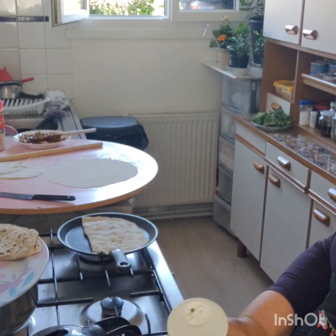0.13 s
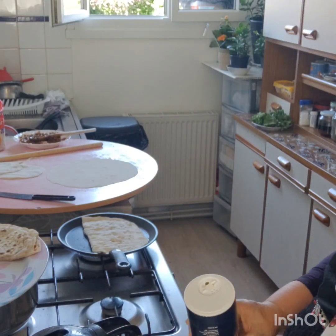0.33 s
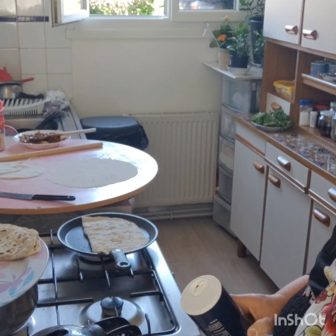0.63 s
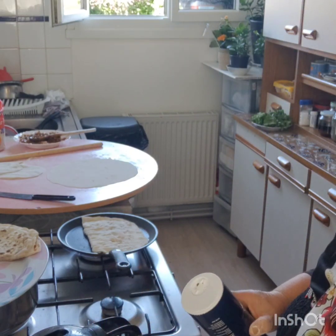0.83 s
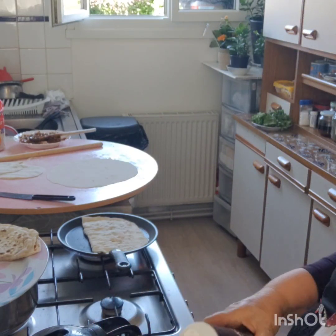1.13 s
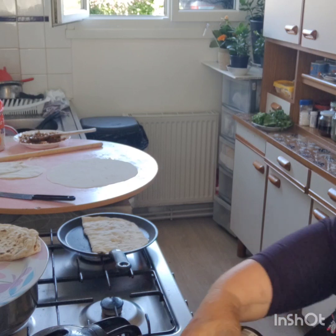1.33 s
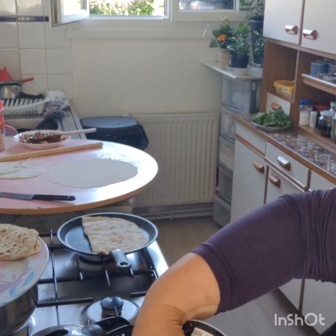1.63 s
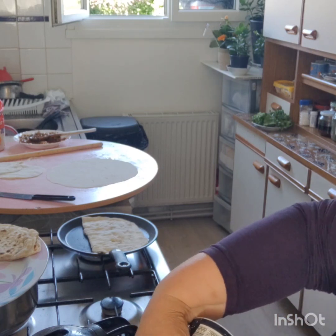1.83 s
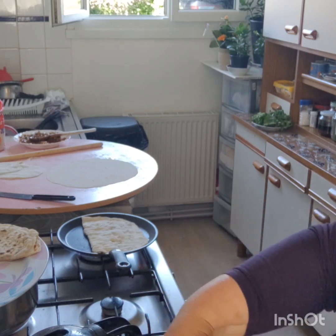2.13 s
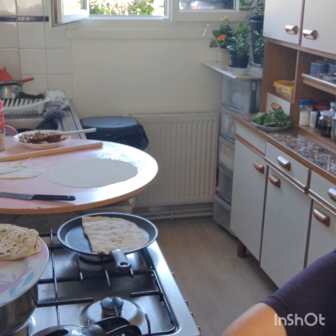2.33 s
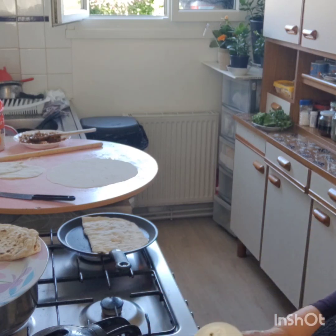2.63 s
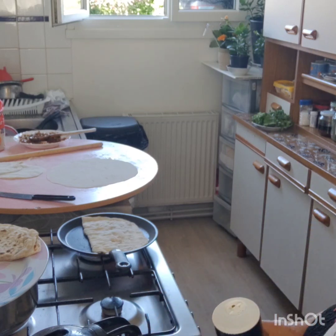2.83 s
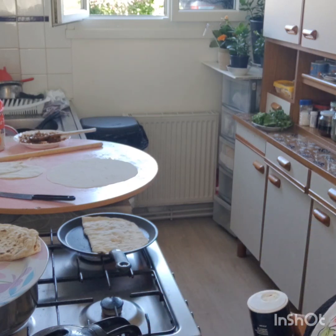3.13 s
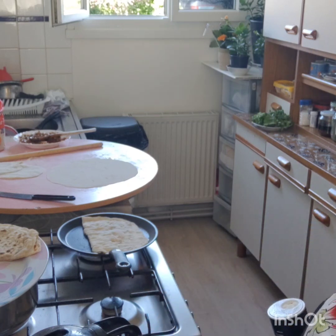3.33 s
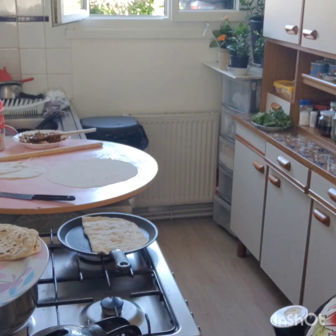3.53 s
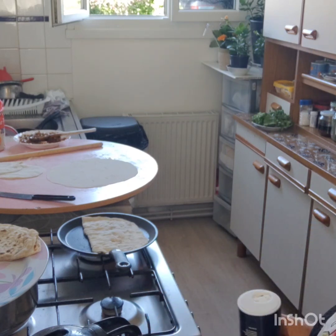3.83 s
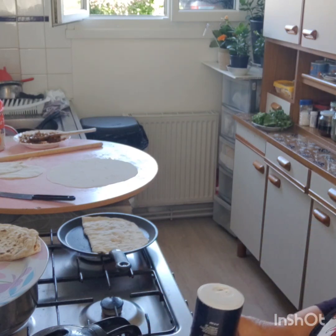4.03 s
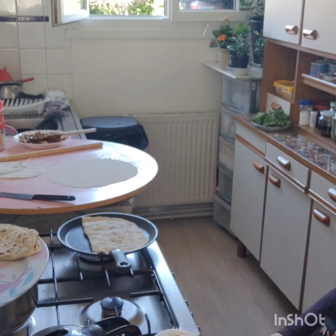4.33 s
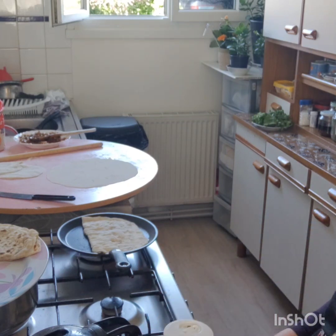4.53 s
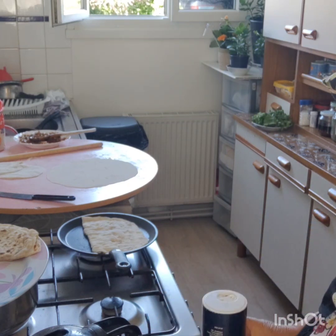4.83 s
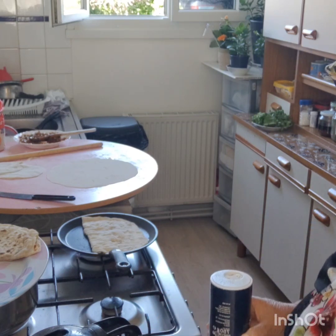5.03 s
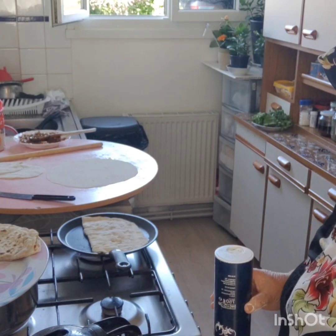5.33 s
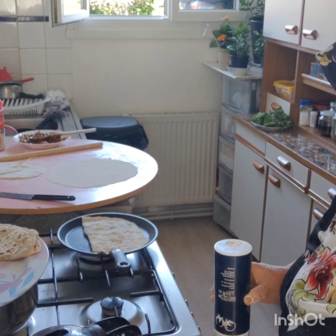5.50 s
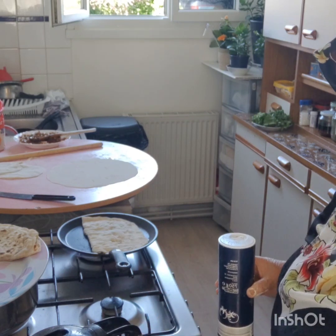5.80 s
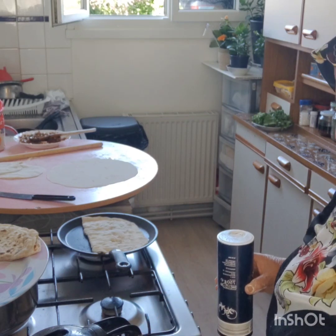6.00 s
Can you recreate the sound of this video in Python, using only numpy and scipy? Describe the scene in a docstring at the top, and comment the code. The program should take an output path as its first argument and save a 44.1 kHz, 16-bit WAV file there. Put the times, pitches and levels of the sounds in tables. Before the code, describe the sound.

A cardboard canister of salt is handled close to the microphone in a small tiled kitchen, over a very faint steady burner hiss. Quiet granular swishes come at the start and around two seconds, with light hollow knocks and ticks. After a sparse, quiet stretch, four far louder palm slaps hit the tube in quick, even succession, each rattling the salt and ringing briefly in the room.

```python
"""Small tiled kitchen: a cardboard salt canister is tipped to and fro near a lit gas stove.
Salt slides along the tube as shaped grain noise; the burner hisses faintly throughout as steady noise.
Hand and lid knock lightly (decaying modes), small taps ring on one note, a few rough blips rise in pitch.
At the end the tube is slapped four times: mode banks struck by palm contacts, each throwing salt about.
Slaps, knocks, taps and blips echo in the kitchen."""
import sys
import numpy as np
from scipy import signal
from scipy.fft import rfft, irfft
from scipy.io import wavfile
from scipy.ndimage import uniform_filter1d

SR = 44100
rng = np.random.default_rng(int(sys.argv[2]) if len(sys.argv) > 2 else 0)


def master(y):
    """Save y as 16-bit WAV."""
    cut = np.clip(np.atleast_2d(y).T, -1, 1)
    pcm = np.round(cut * 32767)  # scale
    wavfile.write(sys.argv[1], SR, pcm.astype(np.int16))


N = 271799  # samples

# slaps on the tube: (time [s], peak before direct and echo gains [dB], brightness [dB/octave],
# contact decay [ms], direct sound gain [dB], left minus right [dB])
SLAPS = [(5.3013, -1.5, -0.37, 0.72, -9.5, -4), (5.497, -1, 0.96, 3.5, -3.5, 0.5),
         (5.674, -5, -0.05, 2.8, -2.5, -11.5), (5.856, -2.5, 0.4, 3, 0, -2.5)]
# stereo width of diffuse sound: (frequency [Hz], side minus mid [dB])
SIDE_DB = [(60, -33), (130, 1), (290, -5.5), (640, -2.5), (1400, -2), (3070, 0.5), (6740, -4.5),
           (14800, -16.5)]
# stereo width of struck sound and echo: (frequency [Hz], side minus mid [dB])
SLAP_SIDE_DB = [(60, -18), (150, -19), (380, -11), (940, 0.5), (2360, -0.5), (5910, 1), (14800, -4.5)]


def from_db(db):
    """Decibels to gain."""
    return 10 ** (np.asarray(db) / 20)


def rms_one(x):
    """Scale to unit rms."""
    return x / np.sqrt(np.mean(x ** 2) + 1e-20)


def peak_one(x):
    """Scale to unit peak."""
    return x / np.abs(x).max()


def at_hz(points, hz):
    """Read a table on a log-frequency axis."""
    table_hz, values = np.array(points).T
    return np.interp(np.log(np.maximum(hz, 1)), np.log(table_hz), values)


def colour(x, spectrum, peaks=()):
    """Shape a steady noise by a spectrum and bell-shaped resonances; rms 1."""
    hz = np.arange(N // 2 + 1) * SR / N
    db = at_hz(spectrum, hz)
    for centre_hz, width_hz, top_db in peaks:
        db = db + top_db / (1 + (2 * (hz - centre_hz) / width_hz) ** 2)
    return rms_one(irfft(rfft(x) * from_db(db), N))


def to_stereo(mid, side, side_db):
    """Two microphone ports: mid plus and minus a side signal weighted by frequency."""
    size = mid.shape[-1]
    hz = np.arange(size // 2 + 1) * SR / size
    side = irfft(rfft(side) * from_db(at_hz(side_db, hz)), size)
    return np.array([mid + side, mid - side])


def drift(rate_hz):
    """Slow random curve below a rate, rms 1, drawn at SR / 40."""
    lowpass = signal.butter(2, rate_hz, fs=SR / 40, output="sos")
    slow = signal.sosfilt(lowpass, rng.standard_normal(N // 40 + 1002))
    slow = rms_one(slow[1000:])  # filter settled
    return np.interp(np.arange(N) / 40, np.arange(N // 40 + 2), slow)


def add(out, s, sound, pan_db):
    """Place a sound in both channels; pan is left minus right."""
    i = round(s * SR)
    out[:, i:i + sound.shape[-1]] += from_db([[pan_db / 2], [-pan_db / 2]]) * sound[..., :N - i]


def mode(hz, t60_s, phase=0, rise_cycles=0.47):
    """One decaying vibration, a quarter second long; a softer contact builds it up over more cycles."""
    t = np.arange(SR // 4) / SR
    rise = 1 - np.exp(-(t * hz / rise_cycles) ** 2)
    return np.sin(2 * np.pi * hz * t + phase) * from_db(-60 * t / t60_s) * rise


def cluster(hz, deadness):
    """Modes round a pitch; the deader the contact, the wider they lie, the faster they rise and die."""
    # (pitch step at deadness 1 [octaves], strength [linear])
    scatter = [(-0.79, 0.25), (-0.37, -0.31), (-0.27, 0.67), (0.193, 0.96), (0.377, -1.15), (0.642, 0.69),
               (1.62, -0.11)]
    deadness = np.clip(deadness, .1, 1)
    t60_s = 4.82 / deadness / hz  # 4.82 cycles of the centre pitch at deadness 1
    sound = 0
    for step, strength in scatter:
        sound = sound + strength * mode(hz * 2 ** (deadness * step), t60_s, rise_cycles=0.4 / deadness)
    return peak_one(sound)


def kitchen(x):
    """A few wall echoes, then a dense tail from tiles and cupboards that dies band by band."""
    # tail decay: (frequency [Hz], t60 [s])
    kitchen_t60 = [(100, 0.4), (300, 0.49), (1000, 0.33), (3000, 0.24), (8000, 0.19), (14000, 0.05)]
    # nearest walls: (delay [s], level [dB])
    wall_echoes = [(.0055, -11), (.011, -22), (.0225, -16.5), (.043, -27.5)]
    t, tail = np.arange(SR // 2) / SR, 0
    white = rng.standard_normal((2, 2, len(t)))
    edges_hz = 60 * 2 ** np.arange(0, 8.3, .5)
    for k, (low_hz, high_hz) in enumerate(zip(edges_hz, edges_hz[1:])):
        bandpass = signal.butter(2, [low_hz, high_hz], "band", fs=SR, output="sos")
        band = signal.sosfilt(bandpass, white[k % 2])
        t60_s = at_hz(kitchen_t60, np.sqrt(low_hz * high_hz))
        tail = tail + band * from_db(-60 * t / t60_s) / np.sqrt(t60_s * SR / (6 * np.log(10)))
    tail = tail * (1 - np.exp(-t / 0.00088))  # build-up, time constant 0.88 ms
    for k, (s, db) in enumerate(wall_echoes):
        tail[:, round(s * SR)] += from_db(db) * np.array([1, (-1) ** k])  # left and right in turn
    response = to_stereo(*tail, SLAP_SIDE_DB)
    return signal.fftconvolve(x.mean(axis=0)[None], response, axes=1)[:, :N]


def grains():
    """Dense ticks of uneven size, mid and side; about half the samples are silent."""
    size = from_db(0.5 * rng.exponential(1, (2, N)))
    return size * rng.standard_normal((2, N)) * (rng.random((2, N)) < .5)


def salt():
    """Thousands of grains a second tick along the wall; the wall itself rustles lower down."""
    # (start [s], loudest [s], end [s], bright hiss [dB], duller rustle [dB], finest grains [dB])
    slides = [(-0.06, 0.126, 0.33, -49, -53, -49), (1.512, 1.696, 1.86, -50, -48.5, -70),
              (1.835, 1.89, 1.945, -62.5, -63.5, -73), (1.962, 2.03, 2.12, -78.5, -80, -90),
              (2.441, 2.655, 2.86, -48, -51, -48)]
    # bright hiss: (frequency [Hz], level per Hz [dB])
    hiss_spectrum = [(2940, -26), (5000, -9.5), (5360, -11.5), (5970, -7.5), (6550, -6), (7060, -3.5),
                     (8260, 6), (9410, -7), (10000, -29), (13000, -42), (22000, -120)]
    # duller rustle: (frequency [Hz], level per Hz [dB])
    rustle_spectrum = [(1200, -11), (1900, -1.5), (2500, 0.5), (3200, 2.5), (4300, -4), (5200, -77),
                       (7000, 1.5)]
    # finest grains: (frequency [Hz], level per Hz [dB])
    fines_spectrum = [(8500, -29), (10000, 1), (11500, 7.5), (12500, 8), (13800, 9), (14600, -14),
                      (15300, 0.5)]
    # how strongly each layer follows the swell: (hiss [ratio], rustle [ratio], finest grains [ratio])
    slide_swing = (0.95, 1.04, 1.32)
    flatness = 2.31  # higher: flatter top, steeper ends
    t, out = np.arange(N) / SR, 0
    for layer, spectrum in enumerate((hiss_spectrum, rustle_spectrum, fines_spectrum)):
        edge_db = 20 * slide_swing[layer]  # start and end below the top
        level = 0
        for start, top, end, *top_db in slides:
            away = np.abs(t - top) / np.where(t < top, top - start, end - top)
            level = level + from_db(top_db[layer] - edge_db * away ** flatness)
        flicker = from_db(drift(38))  # 1 dB rms
        out = out + level * flicker * to_stereo(*colour(grains(), spectrum), SIDE_DB)
    return out


def burner():
    """Steady flame hiss with faint resonances."""
    # (frequency [Hz], level per Hz [dB])
    flame_spectrum = [(24, -53.5), (40, -2.5), (285, -9), (357, -6.5), (506, -8), (852, -2.5), (941, 1.5),
                      (1040, -11.5), (1330, -10.5), (1470, -12.5), (2190, -17), (5500, -19), (6230, -34),
                      (7990, -19), (15300, -51)]
    # resonances: (centre [Hz], width [Hz], height [dB])
    flame_peaks = [(226, 91, 8), (980, 57, 3.5), (1458, 110, 8), (3800, 700, 10.5), (5507, 346, 14.5),
                   (6960, 1760, 13.5), (9290, 280, 13), (12800, 700, 18)]
    noise = colour(rng.standard_normal((2, N)), flame_spectrum, flame_peaks)
    level_db = -68.5 + .7 * drift(3)
    return from_db(level_db) * to_stereo(*noise, SIDE_DB)


def knocks(out, send):
    """Light knocks of hand and lid: boom, thud, a hollow body note and a tick, as decaying modes."""
    # (time [s], boom [dB], thud [dB], body pitch [Hz], body [dB], tick pitch [Hz], tick [dB],
    # tick deadness [0-1, at least 0.1 in effect], left minus right [dB])
    knock_table = [(0.308, -47, -31, 1140, -39, 2410, -47, 0.32, 2),
                   (0.399, -75, -66, 870, -38.5, 2470, -46.5, 0.15, 1),
                   (0.479, -76, -52.5, 770, -48, 2470, -41, .25, -2),
                   (0.484, -83, -59, 800, -65, 2590, -37, 0.21, 2),
                   (0.506, -70, -47, 1044, -42, 2480, -35, .25, 1),
                   (0.517, -80, -59, 910, -55, 2880, -47, 0.28, 2),
                   (0.535, -80, -65, 810, -56, 3100, -54.5, .3, 0.0),
                   (0.634, -83, -63, 860, -59, 3200, -74, 0, 2),
                   (0.705, -61, -46.5, 922, -35.5, 2920, -34, 0.51, -3.5),
                   (0.843, -88, -71, 823, -55, 2100, -61.5, 0.34, -8),
                   (0.986, -78, -58.5, 550, -70, 2500, -82, 0.4, 1.0),
                   (1.438, -88, -61.5, 1080, -52, 2500, -57.5, 0.18, -0.5),
                   (1.588, -61, -53.5, 466, -59, 2380, -48.5, 0.3, 1),
                   (1.852, -68, -55, 730, -59, 2040, -54, 0.32, 6),
                   (2.321, -67.5, -61, 562, -47.5, 1810, -53, 0.35, 0),
                   (2.373, -82, -67, 1130, -50, 2540, -56, 0.27, 3),
                   (2.3842, -64.5, -54.5, 1080, -42, 2610, -44.5, .22, 5),
                   (2.813, -68.5, -57, 717, -30.5, 2690, -25, 0.39, -1),
                   (2.83, -68, -45.5, 875, -34.5, 2750, -50, 0.7, 4),
                   (2.849, -49.5, -63, 830, -48, 2830, -30, .2, -1.5),
                   (2.923, -60.5, -64, 906, -52.5, 2450, -41, 0.32, 3),
                   (3.195, -52.5, -38, 812, -37.5, 2290, -29, 0.38, 4),
                   (3.557, -80, -51, 597, -58.5, 2500, -63, 0.23, 3),
                   (3.589, -65, -50, 704, -65, 2830, -55, 0.3, -1),
                   (3.622, -62, -50.5, 667, -51.5, 1810, -46.5, 0.62, 5),
                   (3.913, -74.5, -65.5, 890, -59.5, 3660, -79, .3, -8),
                   (4.197, -72, -66.5, 844, -62, 2540, -51, 0.46, -1.0),
                   (4.516, -74, -55.5, 950, -59, 2360, -66, .22, -5),
                   (4.662, -81, -57.5, 737, -58.5, 1900, -58, 0.55, -1),
                   (4.769, -82, -57, 958, -66, 3780, -65, .5, 3),
                   (4.856, -78, -65, 790, -54.5, 3790, -59, 0.6, -2)]
    boom_hz, boom_t60_s = 114.5, 0.16
    thud_hz, thud_t60_s = 198, .07
    body_deadness = 0.364
    echo_at_minus_40_db, echo_per_db = 1, 0.2976  # fainter knocks are further off and echo more
    thud = mode(thud_hz, thud_t60_s) + 0.37 * mode(2.35 * thud_hz, thud_t60_s / 2)
    boom = mode(boom_hz, boom_t60_s)
    for s, boom_db, thud_db, hz, body_db, tick_hz, tick_db, deadness, pan_db in knock_table:
        sound = from_db(boom_db) * boom + from_db(thud_db) * thud
        sound = sound + from_db(body_db) * cluster(hz, body_deadness)
        sound = sound + from_db(tick_db) * cluster(tick_hz, deadness)
        peak_db = 20 * np.log10(np.abs(sound).max())
        echo_db = echo_at_minus_40_db - echo_per_db * (peak_db + 40)
        add(out, s, sound, pan_db)
        add(send, s, from_db(echo_db) * sound, pan_db)


def pings(out, send):
    """Small taps that ring on one note: narrow, slowly dying mode clusters."""
    # (time [s], pitch [Hz], peak [dB], left minus right [dB])
    ping_table = [(0.528, 762, -43, -1), (0.607, 730, -48.5, 1), (0.888, 2780, -43, 0.0),
                  (0.912, 2800, -56, 0.0), (2.06, 1430, -59.5, 2), (4.013, 3670, -38, -8),
                  (5.188, 3610, -50, -5.5)]
    deadness, echo_db = 0.1, -6.5
    for s, hz, db, pan_db in ping_table:
        sound = from_db(db) * cluster(hz, deadness)
        add(out, s, sound, pan_db)
        add(send, s, from_db(echo_db) * sound, pan_db)


def blips(out, send):
    """Short rough tones that glide upward, like a finger slipping ever faster on the wall."""
    # (time [s], length [s], start pitch [Hz], end pitch [Hz], level before roughness [dB],
    # roughness [ratio], loudest point [share of length])
    blip_table = [(1.916, 0.0233, 898, 1544, -44.5, 0.82, 0.6), (2.143, 0.053, 519, 2360, -43, 0.59, 0.27),
                  (2.345, 0.036, 1534, 3240, -65, 6.0, 0.66)]
    echo_db = -3
    for s, length_s, start_hz, end_hz, db, roughness, loudest in blip_table:
        share = np.linspace(0, 1, int(length_s * SR))
        noise = uniform_filter1d(rng.standard_normal(SR // 10), size=30)[:len(share)]
        rough = 1 + roughness * noise
        hz = start_hz * (end_hz / start_hz) ** share
        skew = np.log(.5) / np.log(np.clip(loudest, .1, .9))
        swell = np.sin(np.pi * share ** skew)
        tone = np.sin(2 * np.pi * np.cumsum(hz) / SR)
        sound = from_db(db) * rough * swell * tone
        add(out, s, sound, 0)
        add(send, s, from_db(echo_db) * sound, 0)


def light_sounds():
    """Knocks, pings and blips with their room echo; fingers and card are too soft for treble."""
    out, send = np.zeros((2, N)), np.zeros((2, N))
    knocks(out, send)
    pings(out, send)
    blips(out, send)
    finger_cut_hz = 6000
    soft = signal.butter(6, finger_cut_hz, fs=SR, output="sos")
    return signal.sosfilt(soft, out + kitchen(send))


def slaps():
    """The palm lands as a main contact and a few weaker ones; each strikes all modes of the tube."""
    # modes of the tube before brightness and chance: (frequency [Hz], level [dB], t60 [s])
    tube_modes = [(120, -10.5, 0.11), (212.7, -5.5, 0.047), (358, -12.5, 0.035), (495, -9, 0.026),
                  (628, -11.5, 0.043), (756, -7.5, 0.017), (860, -2.5, 0.036), (942, 1.5, 0.036),
                  (988, 1, 0.043), (1092, -9, 0.061), (1310, -34, 0.0053), (1900, -18, 0.0029),
                  (2009, -1, 0.013), (2160, 0.5, 0.0081), (2340, -8.5, .01), (2710, -16, 0.023),
                  (3067, -4, 0.0089), (3400, -9.5, 0.0042), (3890, -21, 0.0017), (5570, -28.5, 0.018),
                  (6960, -38, 0.011), (8200, -29, 0.0054), (8760, -27.5, 0.017), (12000, -39, 0.0056)]
    echo_db = -2.5
    port_bass_hz = 250  # below this both microphone ports hear a near blow alike
    out = np.zeros((2, N))
    t = np.arange(SR // 50) / SR
    fade = np.hanning(2 * SR // 5)[SR // 5:]
    for s, db, tilt_db, contact_ms, direct_db, pan_db in SLAPS:
        luck = rng.normal(0, 1, (len(tube_modes), 2, 2, 1))
        sound = 0  # rows: mid, side
        for (hz, mode_db, t60_s), (chance, turn) in zip(tube_modes, luck):
            level_db = mode_db + 2.7 * chance + tilt_db * np.log2(hz / 1000)
            phase = turn * [[0], [2]]  # random in the side only
            sound = sound + from_db(level_db) * mode(hz, t60_s, phase, 1.29)
        contacts = rng.random(len(t)) * (rng.random(len(t)) < .01) * np.exp(-1000 * t / contact_ms)
        contacts[0] = 1.6  # main contact
        sound = signal.fftconvolve(sound, contacts[None], axes=1)[:, :SR // 4]
        sound = from_db(db) * peak_one(sound)
        near = np.zeros((2, N))
        add(near, s, to_stereo(*sound, SLAP_SIDE_DB)[:, :SR // 5] * fade, pan_db)
        bass = signal.lfilter(*signal.butter(1, port_bass_hz, fs=SR), near)
        near = near - bass + bass.mean(axis=0)
        out += from_db(direct_db) * near + from_db(echo_db) * kitchen(near)
    return out


def spray():
    """Every slap throws salt against the wall, which rattles in clumps and settles."""
    # (frequency [Hz], level per Hz [dB])
    spray_spectrum = [(900, 5.5), (1500, -5.5), (2500, 0), (4200, -5), (5000, -24.5), (6500, -17),
                      (8500, -11.5), (9800, -36), (15000, -48)]
    spray_db, spray_t60_s = -28.5, 0.27  # level relative to the slap's table peak
    t, level = np.arange(N) / SR, 0
    for s, slap_db, *_ in SLAPS:
        decay_db = -60 * np.abs(t - s) / spray_t60_s
        level = level + (t > s) * from_db(slap_db + spray_db + decay_db)
    level = uniform_filter1d(level, size=301, origin=150)  # grains pile up over a few ms
    clumps = from_db(2.2 * drift(66))
    return level * clumps * to_stereo(*colour(grains(), spray_spectrum), SIDE_DB)


def scene():
    """Struck sounds ring in the kitchen over salt and flame."""
    return salt() + burner() + light_sounds() + slaps() + spray()


def record(dry):
    """The microphone drops the deep bass, peaks are rounded, the top is cut."""
    low_cut_hz, top_cut_hz = 88, 15150
    dry = signal.sosfilt(signal.butter(4, low_cut_hz, "high", fs=SR, output="sos"), dry)
    dry = 0.91 * np.tanh(dry / 0.84)
    return signal.sosfilt(signal.ellip(12, .3, 70, top_cut_hz, fs=SR, output="sos"), dry)


dry = scene()
out = record(dry)
master(out)
```